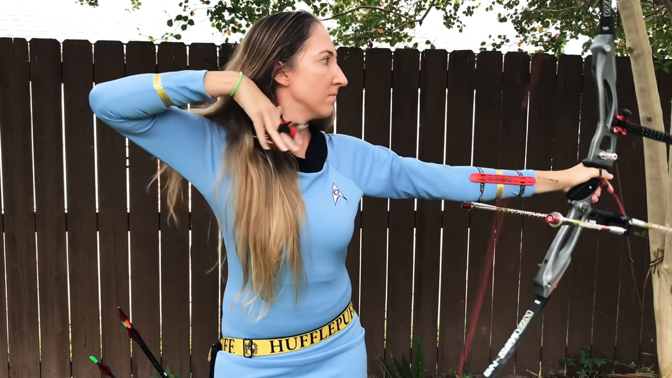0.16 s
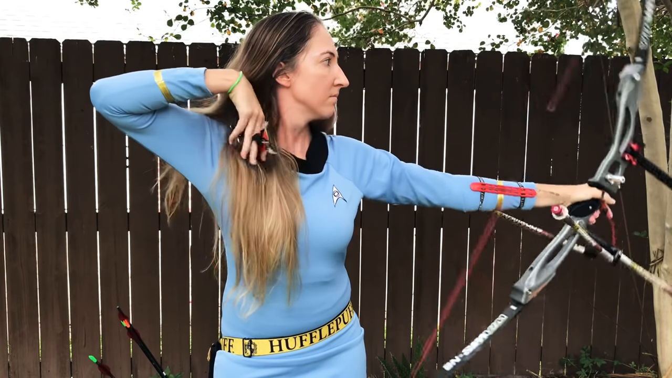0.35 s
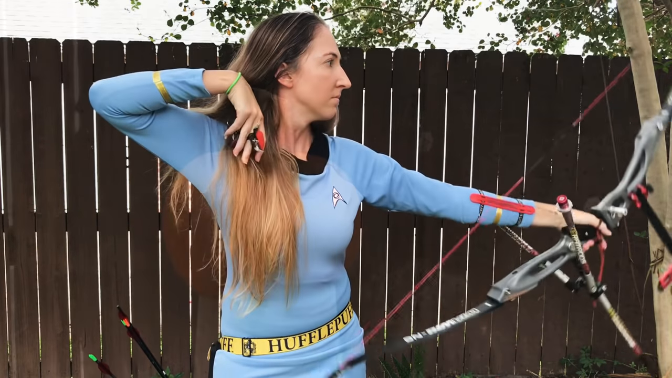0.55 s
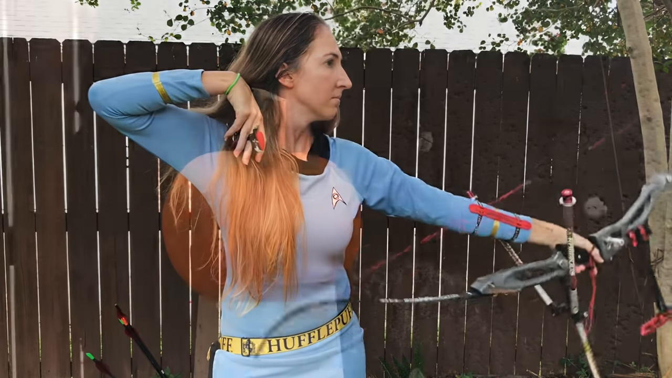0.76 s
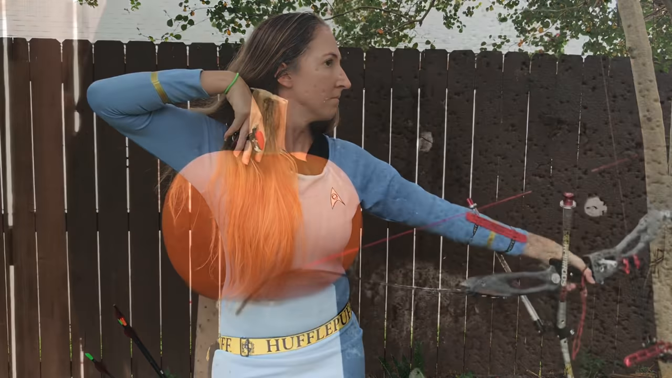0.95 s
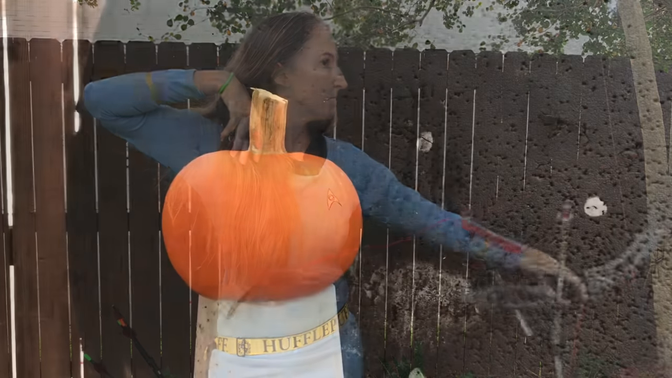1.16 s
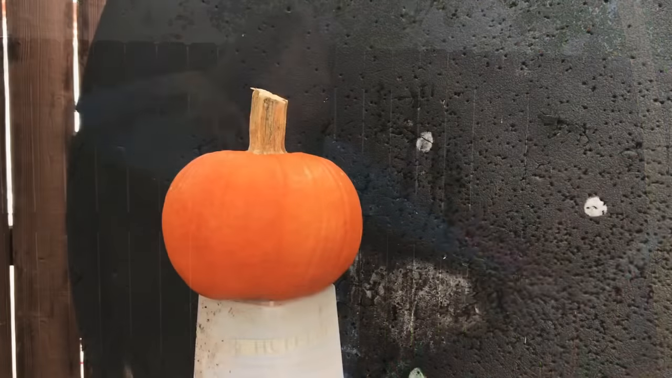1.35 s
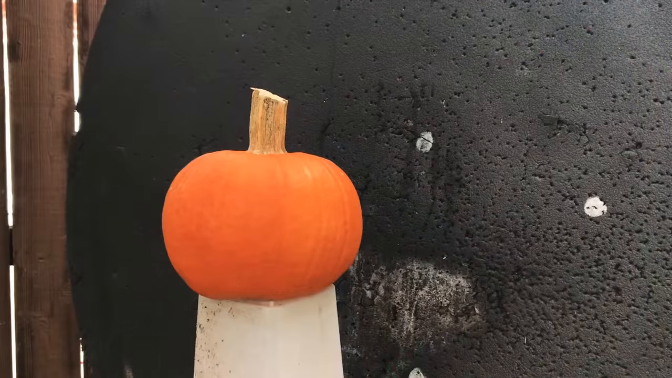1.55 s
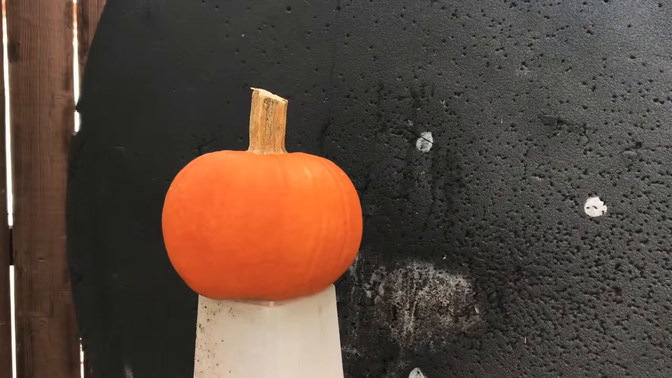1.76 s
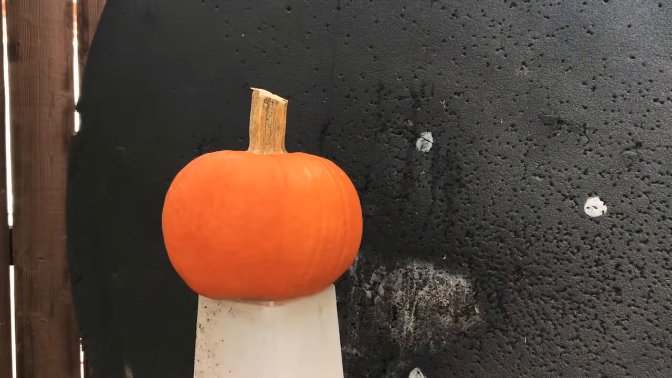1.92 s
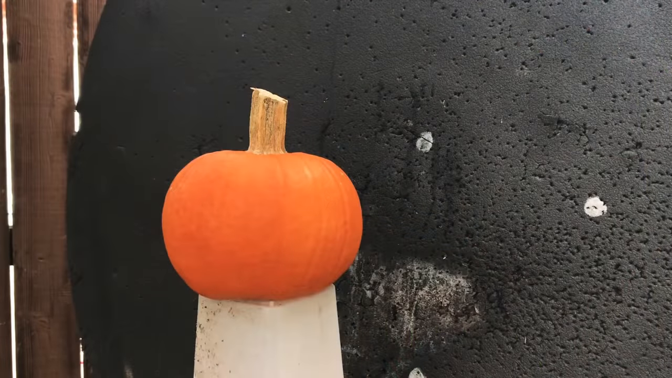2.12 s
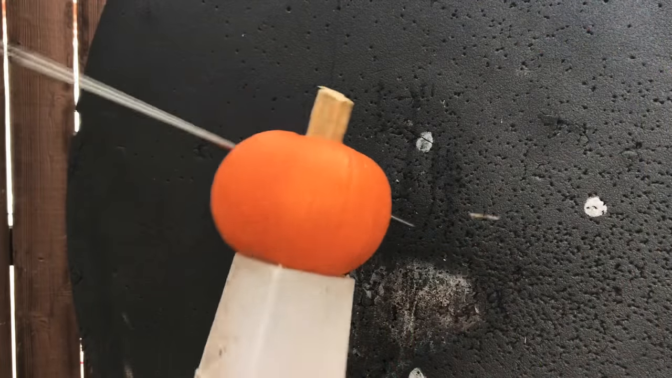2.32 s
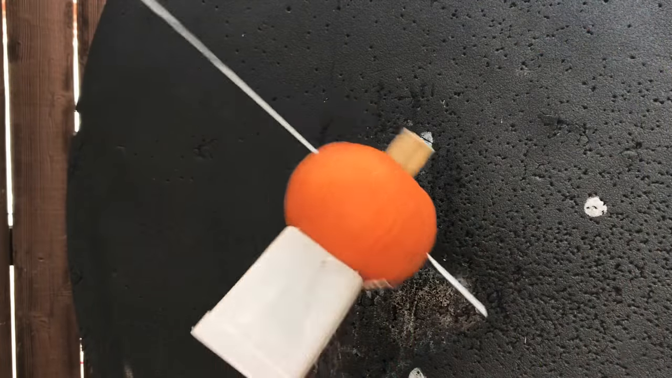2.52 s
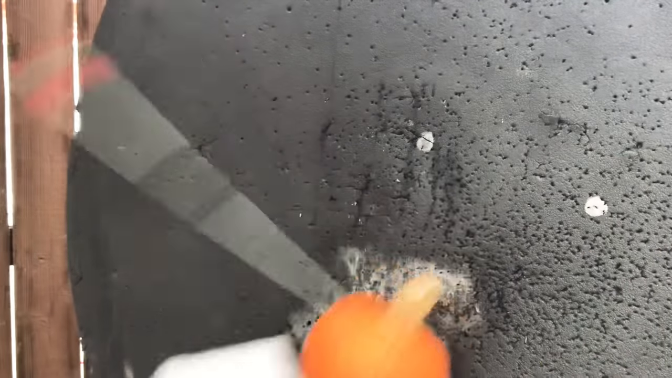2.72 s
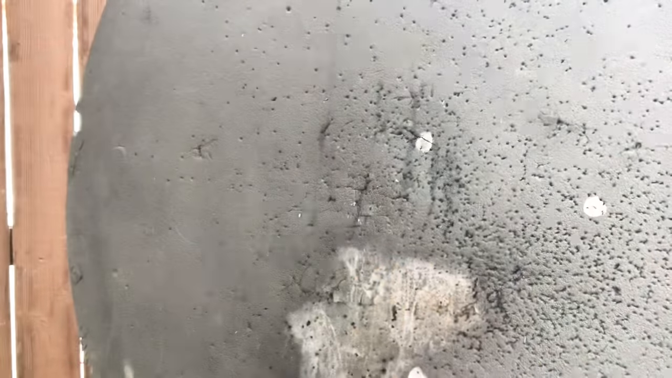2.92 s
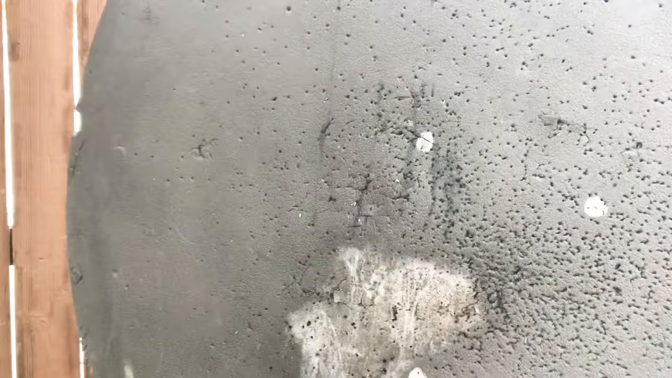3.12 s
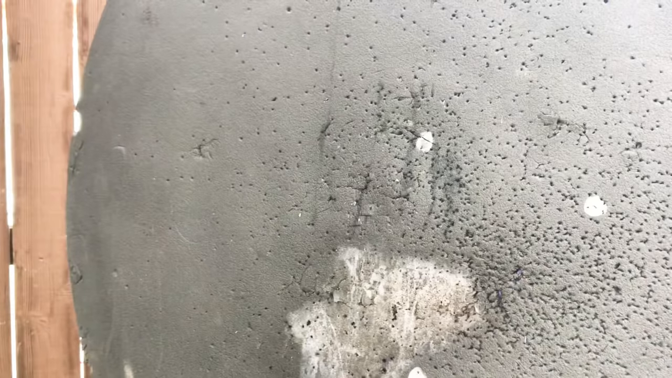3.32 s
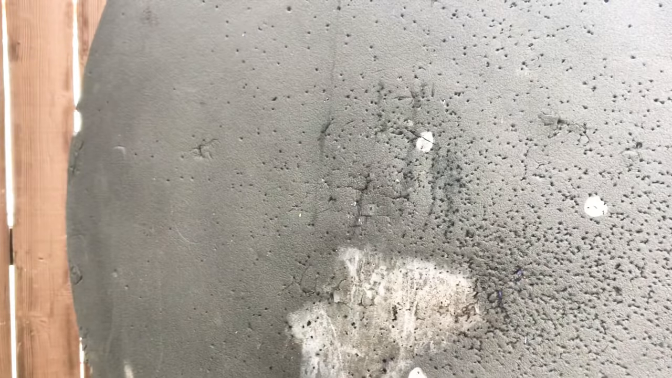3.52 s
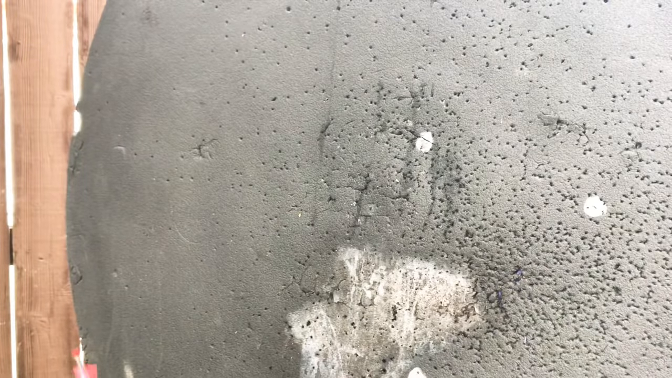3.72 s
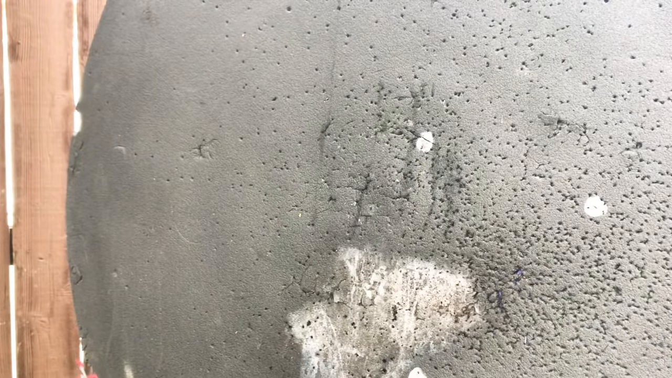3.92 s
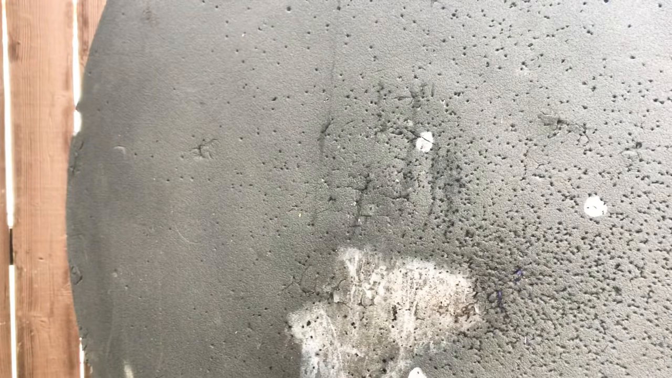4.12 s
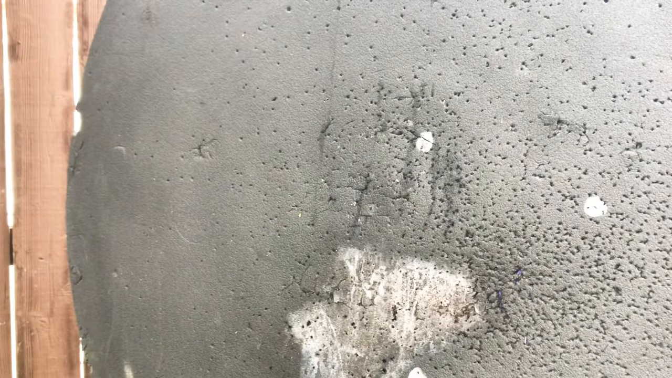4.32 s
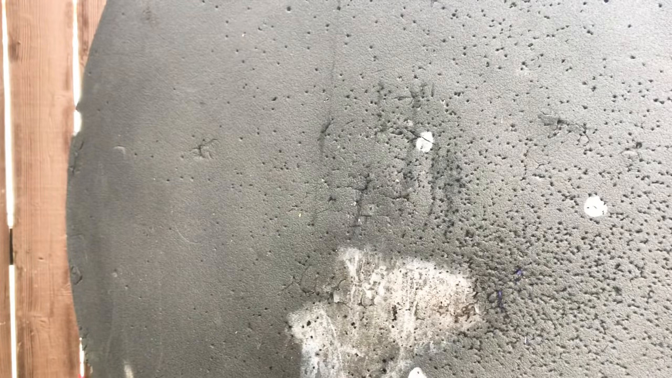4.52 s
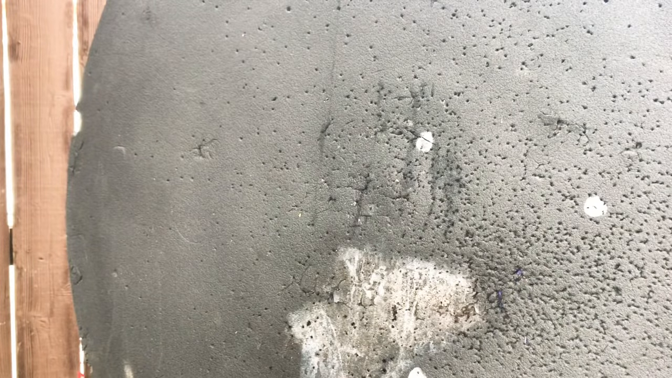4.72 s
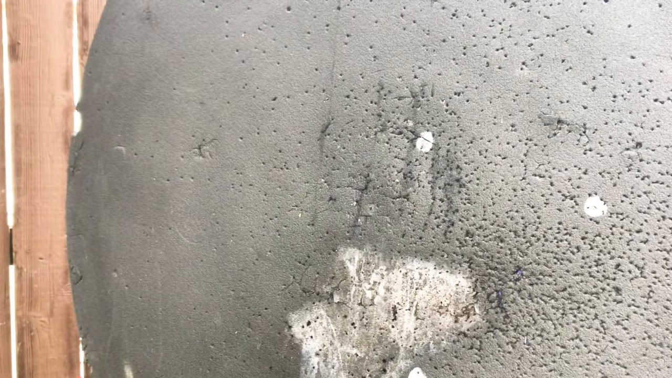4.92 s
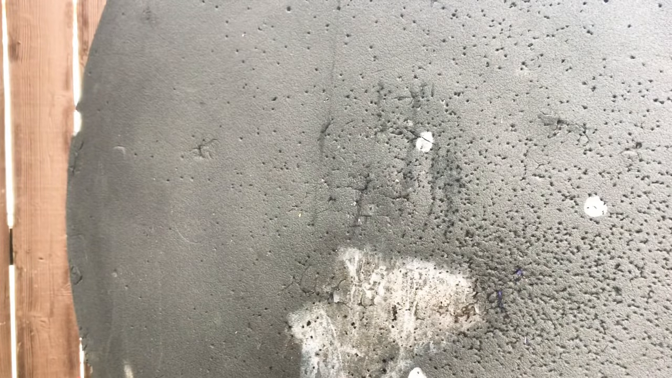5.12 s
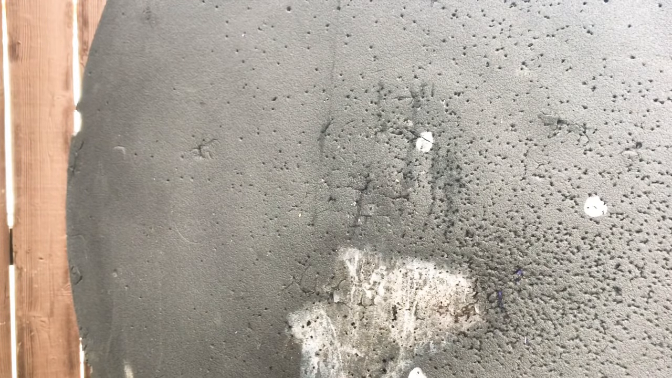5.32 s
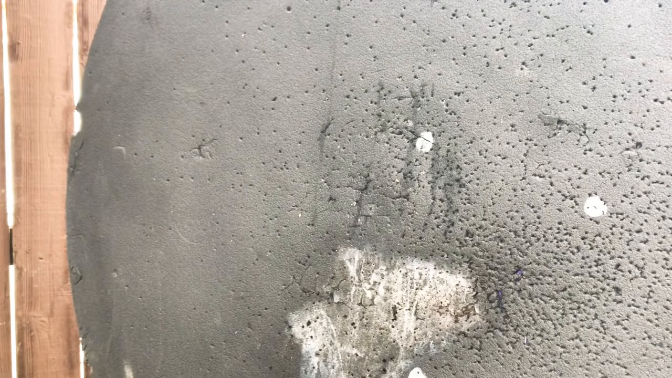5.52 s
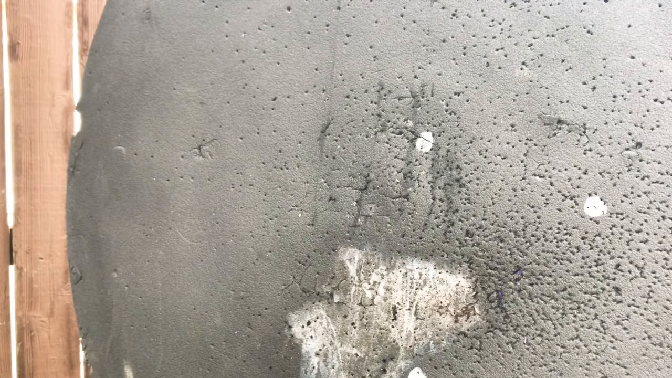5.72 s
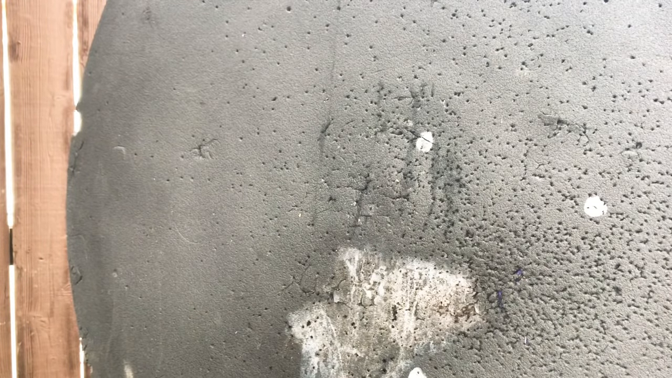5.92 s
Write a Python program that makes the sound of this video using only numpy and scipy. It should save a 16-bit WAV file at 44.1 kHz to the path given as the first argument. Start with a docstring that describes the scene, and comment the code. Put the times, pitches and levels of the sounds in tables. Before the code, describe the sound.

A bow snaps and an arrow smacks foam, then another punches through a gourd on a hollow cup that topples, knocks and rolls in dry grass.

```python
"""A fenced yard, distant traffic rumbling: a bow is loosed and the arrow smacks a foam target.
String rush is shaped noise, squeaks are gliding tones; limbs and foam ring as damped modes.
A second arrow drives through a gourd perched on a hollow cup; the cup rocks, topples, bounces and rolls.
Knocks ring its shell and air cavity, slides scrape and chatter, dry grass snaps in swarms of tiny pulses.
The fence answers the blows with diffuse echoes."""
import sys
import numpy as np
from scipy import signal
from scipy.fft import rfft, irfft, next_fast_len
from scipy.io import wavfile
from scipy.ndimage import uniform_filter1d

SR = 44100
rng = np.random.default_rng(int(sys.argv[2]) if len(sys.argv) > 2 else 0)


def generate_wav(signal):
    """Clip the signal to [-1, 1] and save it as 16-bit WAV at the path in sys.argv[1]."""
    frames = np.transpose(np.atleast_2d(signal))
    scaled = np.clip(frames, -1, 1) * 32767
    pcm = np.round(scaled).astype(np.int16)
    wavfile.write(sys.argv[1], SR, pcm)


def gain_from_db(level_db):
    """Turn a decibel level (scalar or array-like) into a linear amplitude factor."""
    decades = np.asarray(level_db, float) / 20
    return 10 ** decades


N = 267246

# background hiss strength, dropping abruptly at about .56 s: (time [s], level [dB])
HISS_LEVEL = [(0, -60), (.55, -63), (.57, -71), (2.2, -67), (2.65, -63), (3.1, -58), (4.1, -63),
              (6.06, -66)]
# noise colours of traffic and hiss: (frequency [Hz], relative density [dB per Hz])
RUMBLE_COLOUR = [(15, -43), (25, -11), (64, -1), (157, -5.5), (221, -11.5), (348, -13.5), (600, -30),
                 (780, -55.5), (1320, -120)]
HISS_COLOUR = [(350, -31), (600, -3.5), (2990, -12), (3780, -14), (6200, -17.5), (16000, -24.5)]
RUMBLE_MEAN_DB, RUMBLE_SHARE = -52, .55  # share of the hiss level's swings in dB

# rush colours, string then shaft: each (frequency [Hz], relative density [dB per Hz])
RUSH_COLOURS = [
    [(180, -41), (300, -5.5), (762, -19.5), (915, -2.5), (994, -16.5), (1720, -11.5), (16000, -27)],
    [(59, -33.5), (100, -4.5), (1010, -1.5), (2520, -9.5), (3470, -9), (3780, -9.5), (16000, -25)],
]
# rushes swell, hold and die: (start [s], swell [s], hold [s], peak [dB], t60 [s])
STRING_RUSHES = [(.027, .033, .028, -18, .12), (.118, .006, .002, -28.5, .24)]  # release, rebound
SHAFT_RUSH_SWELL = (2.27, .042, .004, -14.5, .135)
SMACK_ECHO_SWELL = (.13, .04, .001, -37.5, .7)
SWELL_POWER = 2.2  # how late a rush gathers
# scattered echoes of the smack from neighbouring yards: (frequency [Hz], relative density [dB per Hz])
YARD_ECHO_COLOUR = [(500, -30), (1100, -2.5), (1600, 1), (2200, -9), (4000, -26)]
# smack on the foam and its faint echo: (time [s], level [dB])
SMACK_AND_ECHO = [(0.1243, -8), (0.19, -35.5)]
# foam target modes: (frequency [Hz], relative level [dB], t60 [s])
FOAM_MODES = [(115, -14, .1), (211, -12, 0.06), (1275, 1, 0.022), (1490, 0, .02), (1790, -3, 0.016),
              (2360, -6, .015)]

# slipping contacts: (time [s], level [dB], start [Hz], end [Hz], overtone relative to tone [dB])
SQUEAK_GLIDES = [(0.044, -10.5, 3000, 4000, -36.5), (0.048, -17, 2800, 2130, -31),
                 (2.785, -10, 4110, 3877, -11.5), (2.79, -17, 3980, 4630, -13)]
SQUEAK_S = .009
# bow limb modes: (frequency [Hz], relative level [dB], t60 before the share of ring time [s])
LIMB_MODES = [(90, -10, 1.6), (152.1, -14.5, 1.8), (192.5, -5, 1.05), (194.6, -3.5, .9), (345, -4, .2),
              (600, -10, .25), (890, -11.5, 0.13)]
# release damped by the archer's grip, rebound free: (time [s], level [dB], share of ring time [1])
LIMB_HITS = [(.05, -14, 0.2), (.125, -26.5, 1.1)]
# decay of the fence's answer: (frequency [Hz], t60 [s])
FENCE_T60 = [(200, 0.35), (1500, .55), (4000, 0.7), (12000, .2)]

# modes of arrow shaft and gourd: (frequency [Hz], relative level [dB], t60 [s])
SHAFT_MODES = [(2370, -13, .04), (2930, -16, 0.09), (3420, -4, .05), (3510, -5, .05), (4120, -2.5, 0.055),
               (4735, -10, 0.06), (5216, -14, 0.07), (6078, -11, 0.08), (10000, -4, 0.014)]
GOURD_MODES = [(183, -7, 0.11), (277.8, -7.5, 0.059), (561.6, -5, 0.11), (640, -8.5, 0.12),
               (947, -9, 0.037), (1330, -9.5, 0.039)]
# jolts of the shaft in the gourd: (time [s], shaft level [dB], gourd level [dB])
SHAFT_JOLTS = [(2.288, -36, -25), (2.3016, -7, -15), (2.31, -13, -15), (2.331, -29.5, -20),
               (2.356, -32.5, -19), (2.683, -37.5, -29), (3.318, -38, -57), (3.847, -40.5, -51),
               (5.022, -35, -55), (5.03, -29, -69)]
# heavy landings on the soil: (time [s], level [dB])
SOIL_THUDS = [(2.295, -22.5), (2.775, -25.5), (2.875, -21), (2.985, -27.5), (3.428, -27), (3.777, -26),
              (4.183, -37)]
# soil modes: (frequency [Hz], relative level [dB], t60 [s])
SOIL_MODES = [(52, -3, .1), (89, -1.5, .08), (155, 1, .09)]

# cup and gourd slide and roll: (start [s], length [s], scrape level [dB], cavity hum level [dB])
SLIDE_RUNS = [(2.32, .3, -38.5, -31), (2.648, .04, -35, -38), (2.7, .14, -34, -36), (2.87, .38, -52, -41),
              (3.3, .07, -48, -55), (3.44, .65, -57.5, -45), (4.145, .15, -60, -44), (4.78, .32, -50, -62),
              (5.56, .1, -54, -68)]
SLIDE_RISE_S, SLIDE_STOP_T60_S = .035, .12
SLIDE_SAG_DB, DUST_DB = 11, -19  # sag as it slows; fine dust relative to the scrape
# noise colours of cavity hum and scraped grit: (frequency [Hz], relative density [dB per Hz])
HUM_COLOUR = [(120, -22), (250, -5.5), (285, 5), (320, -6), (420, -15), (620, -16), (900, -42)]
GRIT_COLOUR = [(300, -17.5), (700, -2), (1600, -3.5), (3300, -14), (4200, -10), (5000, -16), (15000, -33)]
# taps of sliding things: (favoured frequency [Hz], mean rate [1/s], level over the scrape [dB])
CHATTER_TAPS = [(620, 110, 2), (1400, 110, 0), (4000, 90, 2)]
# cup shell modes before struck-spot weighting: (frequency [Hz], relative level [dB], knock t60 [s])
SHELL_MODES = [(410, -5, .06), (500, -10, 0.035), (715, -4.5, .048), (865, -8, 0.031), (1074.7, -1.5, .075),
               (1273, -3, 0.033), (1445, -1, 0.042), (1859, 3, 0.028), (2030, 2, 0.058), (2920, -7, 0.053),
               (4370, -1.5, .015)]
# cup on ground: (time [s], shell level [dB], cavity level [dB], crack level [dB], spot's favoured pitch [Hz])
CUP_KNOCKS = [(2.404, -11, -19, -34.5, 580), (2.497, -26, -21, -55, 488), (2.54, -26, -15, -60, 579),
              (2.588, -28, -25, -60, 600), (2.706, -14, -31, -32, 576), (2.796, -10, -27, -28, 650),
              (2.822, -19, -30, -50, 600), (2.879, -6, -4.5, -19.5, 583), (2.919, -15, -11, -36, 800),
              (2.955, -10, -11.5, -39, 755), (2.989, 1.5, -2, -16, 686), (3.303, -29, -42, -42, 490),
              (3.409, -8.5, -22.5, -17, 1076), (3.421, -16, -17.5, -20.5, 1350),
              (3.432, -17.5, -1.5, -21.5, 452), (3.659, -31, -36.5, -55, 825), (3.703, -38, -41, -60, 791),
              (3.776, -4, -1, -39, 1230), (3.911, -47, -33, -60, 1060), (4.181, -25, -25, -50, 400),
              (4.378, -50, -33, -60, 947), (5.03, -36, -60, -60, 1300)]
# cavity pitch as the cup's mouth turns to and from the soil: (time [s], frequency [Hz])
MOUTH_PITCH = [(2.4, 286), (2.99, 292), (3.43, 283), (3.78, 271), (3.91, 259), (4.18, 278), (4.38, 284)]

# scuffs in dry grass: (time [s], nominal snap level [dB], central stalk pitch [Hz], treble level [dB], t60 [s])
GRASS_SCUFFS = [(2.705, -22, 1460, -40, .2), (2.76, -15, 3200, -24, .09), (2.867, -1, 1550, -40, .1),
                (3.03, -40, 5000, -47, .5), (3.177, -26, 1500, -44, .3), (3.314, -25, 3500, -42, .45),
                (3.41, -5, 3000, -32, .13), (3.535, -34, 2500, -43, .1), (3.984, -30, 2250, -54, .16),
                (4.148, -26, 1800, -51, .14), (4.275, -34, 3000, -53, .12), (4.36, -35, 1850, -58, .14),
                (4.485, -40, 2082, -67, .1), (4.675, -42, 2000, -65, .12), (4.781, -31, 2000, -35, .08),
                (4.803, -23, 1200, -45, .1), (4.822, -24, 2500, -28, .17), (4.934, -29, 2500, -44, .18),
                (5.034, -27, 4000, -50, .3), (5.108, -32, 1500, -46, .14), (5.3, -44, 3000, -56, .12),
                (5.503, -43.5, 2000, -50, .1), (5.61, -32, 2600, -53, .4), (5.855, -44, 5000, -53, .2)]
# noise colour of blade tips and dust: (frequency [Hz], relative density [dB per Hz])
TIPS_COLOUR = [(2500, -25), (5000, -10), (7000, -2.5), (10500, -8.5), (15000, -11)]
SCUFF_RISE_S = .008


def along(points, hz):
    """(Hz, value) points interpolated on a log frequency axis."""
    point_hz, value = np.transpose(points)
    return np.interp(np.log(hz + 1), np.log(point_hz + 1), value)


def curve(rows):
    """(s, value) rows interpolated to one value per sample."""
    return np.interp(np.arange(N) / SR, *np.transpose(rows))


def noise(colour, grainy_db=0, patchy_db=0):
    """Coloured noise of rms 1, broken into millisecond grains and patches of changing colour."""
    grains = np.repeat(rng.standard_normal(N // 40 + 1), 40)[:N].clip(-2, 2)
    z = signal.stft(rng.standard_normal(N) * gain_from_db(grainy_db * grains), nperseg=256)[2]
    patches = uniform_filter1d(rng.standard_normal(z.shape), size=3, axis=0)
    patches = uniform_filter1d(patches, size=5, axis=1)
    rough = signal.istft(z * gain_from_db(patchy_db * patches / patches.std()), nperseg=256)[1][:N]
    m = next_fast_len(N)
    gain = gain_from_db(along(colour, np.fft.rfftfreq(m, 1 / SR)))
    x = irfft(rfft(rough, m) * gain, m)[:N]
    return x / x.std()


def add(out, start_s, sound):
    """Mixes a sound in place from start_s, cut at the end of out."""
    part = out[round(start_s * SR):][:len(sound)]
    part += sound[:len(part)]


def ring(modes, attack_s=.0004, scatter_db=2, rough=0):
    """Damped modes struck at fresh strengths; loose contact makes their phase wander."""
    hz, db, t60 = np.array(modes).T[:, :, None]
    t = np.arange(int(min(1.8 * t60.max(), 1) * SR)) / SR
    level = gain_from_db(db + scatter_db * rng.standard_normal(hz.shape) - 60 * t / t60)
    steps = rng.standard_normal(level.shape)
    wander = rough * np.sqrt(hz / SR) * np.cumsum(steps, axis=1)
    partials = level * np.sin(2 * np.pi * hz * t + wander)
    return partials.sum(0) * (1 - np.exp(-t / attack_s))


def crack(t60_s, dull=.5, debris_db=-14):
    """Broadband tick of first contact, trailed by settling grit; dull is a double low-pass pole."""
    t = np.arange(SR // 8) / SR
    poles = np.convolve([1, -dull], [1, -dull])
    tick = signal.lfilter([1, -1], poles, rng.standard_normal(len(t)))
    return tick / tick.std() * (gain_from_db(-60 * t / t60_s) + gain_from_db(debris_db - 60 * t / 0.14))


def swell(start_s, rise_s, hold_s, peak_db, t60_s, power=SWELL_POWER):
    """Gain that gathers by a power law, holds and dies exponentially."""
    t = np.arange(N) / SR - start_s
    decay = gain_from_db(peak_db - 60 * np.maximum(t - rise_s - hold_s, 0) / t60_s)
    return decay * np.clip(t / rise_s, 0, 1) ** power


def background():
    """Low coloured noise of traffic under a faint hiss; the rumble shares part of the hiss's swings."""
    hiss_db = curve(HISS_LEVEL)
    rumble_db = RUMBLE_MEAN_DB + RUMBLE_SHARE * (hiss_db - hiss_db.mean())
    return gain_from_db(rumble_db) * noise(RUMBLE_COLOUR) + gain_from_db(hiss_db) * noise(HISS_COLOUR)


def bow():
    """String rush as swelling noise; foam modes and ticks for the smack and its echo, then scattered echoes."""
    out = sum(swell(*row) for row in STRING_RUSHES) * noise(RUSH_COLOURS[0], grainy_db=3)
    out += swell(*SMACK_ECHO_SWELL) * noise(YARD_ECHO_COLOUR, grainy_db=2)
    for s, db in SMACK_AND_ECHO:
        add(out, s, gain_from_db(db) * ring(FOAM_MODES, rough=.3))
        add(out, s, gain_from_db(db - 12.5) * crack(.015))
    return out


def fence(x):
    """Diffuse echoes: delayed decaying noise, each frequency dying at its own speed."""
    hz, t, z = signal.stft(rng.standard_normal(SR // 2), SR, nperseg=256)
    decay = gain_from_db(-60 * t / along(FENCE_T60, hz)[:, None])
    tail = signal.istft(z * decay, SR, nperseg=256)[1]
    delayed = np.pad(x, (600, 0))  # samples
    return signal.fftconvolve(delayed, tail / np.linalg.norm(tail))[:N]


def squeaks():
    """Stick-slip contact: short gliding tones with one overtone."""
    out, n = np.zeros(N), int(SQUEAK_S * SR)
    for s, db, start_hz, end_hz, over_db in SQUEAK_GLIDES:
        phase = 2 * np.pi * np.cumsum(np.linspace(start_hz, end_hz, n)) / SR
        tone = np.sin(phase) + gain_from_db(over_db) * np.sin(2 * phase)
        add(out, s, gain_from_db(db) * np.hanning(n) * tone)
    return out


def limbs():
    """Limb modes hum after the damped release and again on the free rebound."""
    out = np.zeros(N)
    for s, db, share in LIMB_HITS:
        modes = [(hz, level, t60 * share) for hz, level, t60 in LIMB_MODES]
        add(out, s, gain_from_db(db) * ring(modes, attack_s=.0017, scatter_db=.6, rough=.05))
    return out


def arrow():
    """Shaft tears the rind as a noise rush; shaft and gourd ring at each jolt, landings thud in the soil."""
    out = swell(*SHAFT_RUSH_SWELL) * noise(RUSH_COLOURS[1], grainy_db=5.5)
    for s, shaft_db, gourd_db in SHAFT_JOLTS:
        add(out, s, gain_from_db(shaft_db) * ring(SHAFT_MODES, scatter_db=2.5, rough=.25))
        add(out, s, gain_from_db(gourd_db) * ring(GOURD_MODES, attack_s=.00036, scatter_db=3, rough=.33))
        add(out, s, gain_from_db(shaft_db - 3) * crack(.006, dull=.16))
    for s, db in SOIL_THUDS:
        add(out, s, gain_from_db(db) * ring(SOIL_MODES, attack_s=.0022, scatter_db=1.25))
    return out


def sliding():
    """Gains of scrape and cavity hum: each slide starts, slows and stops."""
    gains, t = np.zeros((2, N)), np.arange(N) / SR
    for s, length, scrape_db, hum_db in SLIDE_RUNS:
        sag = gain_from_db(-SLIDE_SAG_DB * np.clip((t - s) / length, 0, 1))
        shape = swell(s, SLIDE_RISE_S, length, 0, SLIDE_STOP_T60_S, power=1) * sag
        gains += gain_from_db(np.array([[scrape_db], [hum_db]])) * shape
    return gains


def shell_near(spot_hz):
    """Shell modes weakened by 16 dB per octave away from the struck spot's favoured pitch."""
    return [(hz, level - 16 * abs(np.log2(hz / spot_hz)), t60) for hz, level, t60 in SHELL_MODES]


def chatter(scrape):
    """Random small taps ring the shell, at half its knock ring time, while it slides."""
    out = np.zeros(N)
    for spot_hz, rate, db in CHATTER_TAPS:
        taps = (rng.random(N) < rate / SR) * rng.laplace(size=N) * scrape
        modes = [(hz, level, .5 * t60) for hz, level, t60 in shell_near(spot_hz)]
        tap = ring(modes, attack_s=.0002, rough=.6)
        out += gain_from_db(db) * signal.fftconvolve(taps, tap)[:N]
    return out


def cup():
    """Slides scrape, hum and chatter; each knock pumps the cavity, rings the shell near its spot and cracks."""
    scrape, hollow = sliding()
    out = hollow * noise(HUM_COLOUR, grainy_db=3.5)
    out += scrape * noise(GRIT_COLOUR, grainy_db=3.5, patchy_db=4)
    out += scrape * gain_from_db(DUST_DB) * noise(TIPS_COLOUR, grainy_db=3, patchy_db=3)
    out += chatter(scrape)
    for s, shell_db, cavity_db, crack_db, spot_hz in CUP_KNOCKS:
        add(out, s, gain_from_db(shell_db) * ring(shell_near(spot_hz), attack_s=.0002, rough=.45))
        # a mouth turned to the soil sounds lower and dies sooner
        cavity_hz = np.interp(s, *np.transpose(MOUTH_PITCH))
        cavity = [(cavity_hz, 0, .11 * (cavity_hz / 292) ** 4.2)]
        add(out, s, gain_from_db(cavity_db) * ring(cavity, attack_s=.003, scatter_db=.16, rough=.11))
        add(out, s, gain_from_db(crack_db) * crack(.021, dull=.8, debris_db=-15.5))
    return out


def grass():
    """Each scuff is a swarm of tiny stalk snaps around one pitch, under a fizz of blade tips."""
    out, tips, t = np.zeros(N), np.zeros(N), np.arange(SR // 4) / SR
    snap_t = t[:300]
    for s, db, hz, treble_db, t60 in GRASS_SCUFFS:
        shape = (1 - np.exp(-(t / SCUFF_RISE_S) ** 2)) * gain_from_db(-60 * t / t60)
        add(tips, s, gain_from_db(treble_db) * shape)
        when = rng.random(size=600)
        octaves = .85 * rng.standard_normal(size=(600, 1))
        size = rng.exponential(size=600)
        start = (when ** 1.5 * min(t60, .2) * SR).astype(int)  # crowded early
        pitch_hz = np.minimum(hz * 2 ** octaves, SR / 3)
        # soft start, a cycle or two each
        cycles = snap_t * pitch_hz
        snaps = np.sin(2 * np.pi * cycles) * cycles * np.exp(-cycles / .8)
        snaps *= (shape[start] * gain_from_db(db - 11 + np.minimum(6 * size, 9)))[:, None]
        place = start[:, None] + np.arange(len(snap_t))
        add(out, s, np.bincount(place.ravel(), snaps.ravel()))
    return out + tips * noise(TIPS_COLOUR, grainy_db=3, patchy_db=4)


def scene():
    """The shot draws more echo than the near cup; the low hum of the limbs draws none."""
    far = bow()
    near = arrow() + cup() + grass() + squeaks()
    echoes = gain_from_db(-22) * fence(far) + gain_from_db(-28.5) * fence(near)
    return (far + limbs() + near + echoes + background())[None]


def roll_off(x):
    """The treble ends steeply here."""
    return signal.sosfilt(signal.butter(12, 16790, fs=SR, output="sos"), x)


def record(dry):
    """Microphone path: passes little deep bass, ends just under 16 kHz and rounds off the highest peaks."""
    steep = signal.ellip(8, .5, 40, 15900, fs=SR, output="sos")
    bass_cut = signal.butter(4, 40, "high", fs=SR, output="sos")
    heard = signal.sosfilt(np.vstack([steep, bass_cut]), dry)
    rounded = heard / (1 + np.abs(heard) ** 6) ** (1 / 6)
    return roll_off(rounded)


dry = scene()
out = record(dry)
generate_wav(out)
```